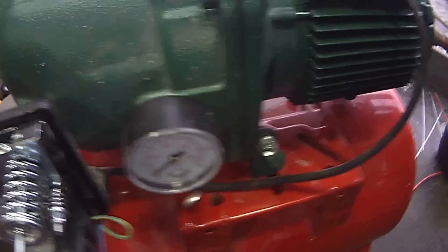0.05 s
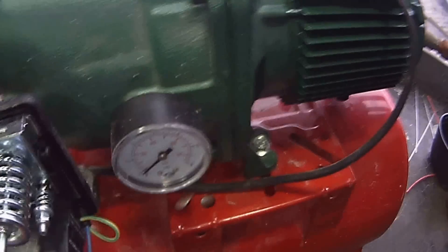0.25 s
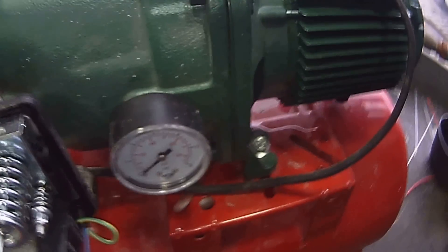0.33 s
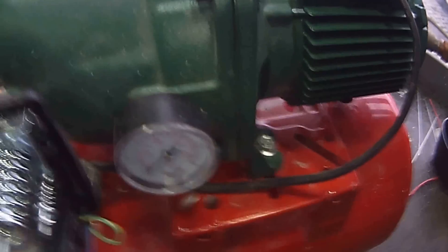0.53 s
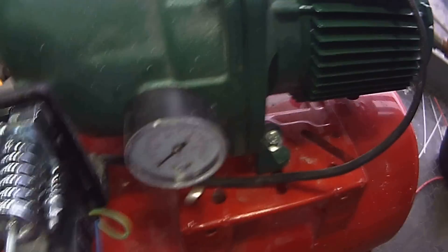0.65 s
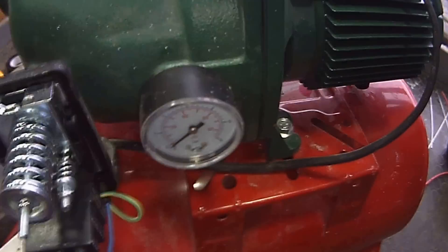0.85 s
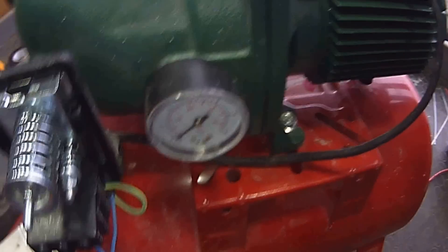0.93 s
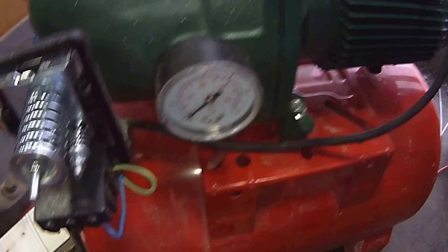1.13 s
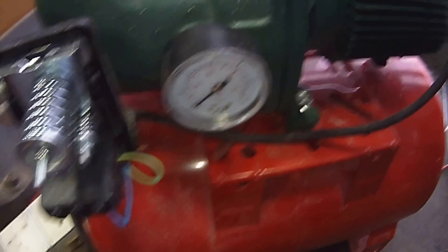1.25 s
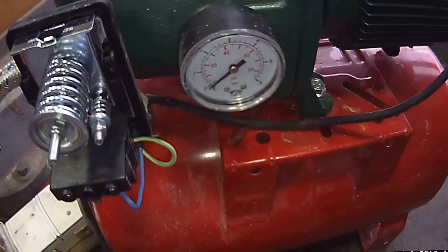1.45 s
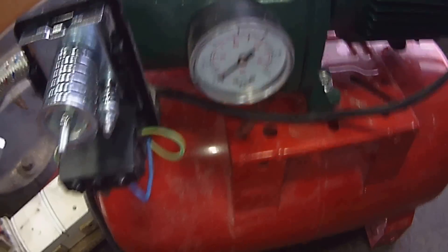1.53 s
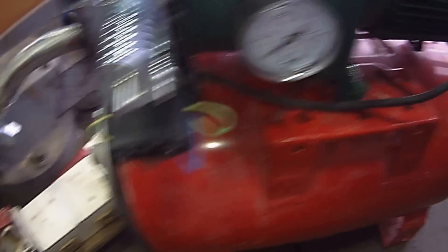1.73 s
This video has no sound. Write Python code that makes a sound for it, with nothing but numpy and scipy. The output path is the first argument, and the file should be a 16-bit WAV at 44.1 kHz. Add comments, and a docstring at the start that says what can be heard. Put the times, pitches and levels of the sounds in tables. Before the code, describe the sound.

A pump's pressure switch snaps over with one heavy, close clack at about 0.2 seconds, briefly ringing the housing and steel tank in a small room. Dying rattles, soft low thumps and light metal ticks follow until about 0.6 seconds, with a short spring chatter near 0.5 seconds. The tail fades by about one second, leaving the faint low hum and rumble that run throughout.

```python
"""Pump pressure switch snapping over

The sprung lever of a water pump's pressure switch lands with one heavy clack, close by in a small room.
The blow rings the housing and the steel tank; the mechanism shudders in a few dying rattles, ticks,
and its spring chatters. A low hum and rumble carry on underneath."""
import sys
import numpy as np
from scipy import signal
from scipy.fft import irfft
from scipy.io import wavfile
from scipy.ndimage import uniform_filter1d

SR = 44100
rng = np.random.default_rng(int(sys.argv[2]) if len(sys.argv) > 2 else 0)


def log_audio(samples):
    """Write samples as a 16-bit WAV file to the path given in sys.argv[1]."""
    # one column per channel
    frames = np.atleast_2d(samples).T
    # limit to full scale, then quantise
    limited = np.clip(frames, -1, 1)
    pcm = np.round(limited * 32767).astype(np.int16)
    wavfile.write(sys.argv[1], SR, pcm)


N = 79380


def amp(db):
    """Decibels to gain."""
    return 10 ** (np.asarray(db) / 20)


def unit(x):
    """Scale to an rms of one."""
    return x / np.sqrt(np.mean(x ** 2) + 1e-18)


def since(start):
    """Seconds since a moment, zero before it."""
    return np.maximum(np.arange(N) / SR - start, 0)


def strike(start, t60, contact_s=0.00059):
    """Hit envelope: a fast attack as the contact builds its force, then an exponential decay."""
    t = since(start)
    attack = np.sin(np.pi / 2 * np.minimum(t / contact_s, 1)) ** 2
    return attack * np.exp(-np.log(1000) * t / t60)


def noise(colour):
    """Steady noise at unit rms, shaped by an EQ curve."""
    hz, db = np.array(colour).T
    freqs = np.maximum(np.fft.rfftfreq(N, 1 / SR), 1)
    gain = amp(np.interp(np.log(freqs), np.log(hz), db))
    return unit(irfft(gain * np.exp(2j * np.pi * rng.random(len(freqs))), N))


def ring(modes, start):
    """Decaying modes struck together; neighbours swing in opposite directions."""
    t = since(start)
    return sum((-1) ** (k + 1) * amp(db) * strike(start, t60) * np.sin(2 * np.pi * hz * t)
               for k, (hz, db, t60) in enumerate(modes))


def resonate(push, peaks):
    """Drive parallel resonators of alternating polarity; the mix comes out at unit rms."""
    return unit(sum((-1) ** k * amp(db) * signal.lfilter(*signal.iirpeak(hz, hz / width, fs=SR), push)
                    for k, (hz, width, db) in enumerate(peaks)))


def band(x, kind, hz, order):
    """Low-pass or band-pass with a flat passband."""
    return signal.sosfilt(signal.butter(order, hz, kind, fs=SR, output="sos"), x)


# EQ of the blow's transient (frequency [Hz], relative level [dB])
CRACK_EQ = [(40, -32), (90, -18), (240, 7.5), (420, -13), (560, -18), (850, -7.5), (1400, -12.5),
            (2700, -15.5), (3500, -28.5), (4700, -38), (6200, -34.5), (9200, -39.5), (11000, -47.5),
            (15500, -61)]
# EQ of the room's answer (frequency [Hz], relative level [dB])
ROOM_EQ = [(45, -28), (70, -3), (125, 0.5), (240, 4.5), (350, 4.5), (550, -4.5), (820, -8.5), (1200, -6),
           (2000, -12.5), (2650, -9.5), (3400, -26), (4700, -47), (6200, -34.5), (7500, -40), (9200, -33),
           (11000, -56), (15500, -62)]
# ring of the housing and tank (frequency [Hz], relative level [dB], t60 [s])
BODY_MODES = [(70.3, -11, 0.75), (82.4, -26.5, 0.22), (173, -6, 0.19), (235, 4, 0.21), (268, 0, 0.15),
              (281.8, -2.5, 0.21), (339, -12, .2), (427.7, -14, 0.32), (745, -19, 0.3), (811.5, -4, 0.11),
              (986, -21, 0.65), (1200, -33, 0.13), (1780, -42, .2), (2140, -19, 0.17)]
# thin, high ring of the contacts (frequency [Hz], level [dB], t60 [s])
CONTACT_MODES = [(9120, -60, .5), (9390, -58.5, 0.48)]


def clack(start=0.2303):
    """The lever hits its stop: a crack, ringing body and contacts, and the bloom of the room."""
    crack = amp(-18.5) * noise(CRACK_EQ) * strike(start, t60=0.1)
    bloom = 1 - np.exp(-since(start) / 0.0041)
    room = amp(-25) * noise(ROOM_EQ) * strike(start, t60=0.65) * bloom
    body = amp(-18.5) * ring(BODY_MODES, start)
    return crack + room - body + ring(CONTACT_MODES, start)


# low-end hits of the tank (time [s], level [dB])
THUMP_CUES = [(.2315, -28.5), (0.307, -34.5), (0.454, -32.5), (.548, -33), (.602, -36)]


def thumps(hz=82, rise_s=0.019):
    """The tank heaves for a few slow cycles, adding weight under the clack and rattles."""
    out = 0
    for start, db in THUMP_CUES:
        t = since(start)
        swell = (t / rise_s * np.exp(1 - t / rise_s)) ** 2
        out += amp(db) * swell * np.sin(2 * np.pi * hz * t)
    return out


# shudders of the mechanism (time [s], length [s], thud [dB], clatter [dB], scrape [dB])
RATTLE_CUES = [(.256, 0.045, -31.5, -36.5, -56), (0.301, 0.054, -29.5, -32.5, -55.5),
               (0.391, .03, -39, -45.5, -71), (0.414, 0.043, -40.5, -35, -67),
               (0.448, 0.025, -35.5, -38, -60), (0.49, 0.0454, -43.5, -51, -63),
               (0.528, .036, -43, -46, -58.5), (0.57, 0.062, -44, -47, -69)]
# dull resonances of the tank (frequency [Hz], width [Hz], relative level [dB])
THUD_PEAKS = [(147, 63, -3), (252.6, 77, 1.5), (337, 33, -5), (433, 84, -5.5)]
# midrange resonances of the housing (frequency [Hz], width [Hz], relative level [dB])
CLATTER_PEAKS = [(475, 45, -9), (657, 105, 1.5), (836, 43, 9.5), (1011, 68, -1.5), (1148, 82, -1),
                 (1410, 135, -3), (1810, 190, -8.5), (2070, 81, -3), (2437, 166, -3.5), (2890, 87, -8),
                 (3190, 89, -15)]
# bright metal EQ of the scrape and the ticks (frequency [Hz], relative level [dB])
METAL_EQ = [(500, -14), (2500, 14), (3700, 12), (4800, -0.5), (6200, 7), (7300, -1), (8800, 8.5),
            (10500, -7), (12500, -30), (15500, -28)]


def rattles(impacts_per_s=1500, scatter_db=0.5, edge=0.35):
    """Bursts of dense small impacts thud in the tank, clatter in the housing and scrape."""
    impacts = (rng.random(N) < impacts_per_s / SR) * rng.choice([-1, 1], N)
    impacts = impacts * amp(scatter_db * rng.standard_normal(N))
    thud = band(resonate(impacts, THUD_PEAKS), "lowpass", hz=900, order=2)
    clatter = band(resonate(impacts, CLATTER_PEAKS), "lowpass", hz=3540, order=6)
    scrape = noise(METAL_EQ)
    out = 0
    for start, length, thud_db, clatter_db, scrape_db in RATTLE_CUES:
        progress = since(start) / length
        # fade in and out, each over `edge` of the burst's length
        gate = np.clip(np.minimum(progress, 1 + edge / 2 - progress) / edge, 0, 1)
        out += gate * (amp(thud_db) * thud + amp(clatter_db) * clatter + amp(scrape_db) * scrape)
    return out


# hits of the spring on its seat (time [s], level [dB])
CHATTER_CUES = [(.475, -29.5), (0.497, -39)]
# zing of the coils (frequency [Hz], width [Hz], relative level [dB])
SPRING_PEAKS = [(1830, 55, -5), (2421, 83, 1), (2690, 110, -5), (2990, 90, -11.5), (3160, 64, -11.5)]


def spring():
    """The spring chatters against its seat and its coils ring briefly."""
    coils = resonate(rng.standard_normal(N), SPRING_PEAKS)
    zing = band(coils, "bandpass", hz=(1800, 3340), order=3)
    return zing * sum(amp(db) * strike(start, t60=0.067) for start, db in CHATTER_CUES)


# light taps of the lever (time [s], level [dB])
TICK_CUES = [(0.3176, -44), (0.3904, -49.5), (0.4445, -45), (0.4694, -43), (0.4747, -46), (0.59, -50),
             (0.6038, -47.5)]


def ticks():
    """The lever touches lightly, metal on metal, dry and close."""
    return noise(METAL_EQ) * sum(amp(db) * strike(start, t60=0.025) for start, db in TICK_CUES)


def walls(x, wet_db=-7):
    """The walls add a short diffuse tail to the direct sound."""
    tail = rng.standard_normal(N) * strike(0, t60=0.89)
    return x + amp(wet_db) * signal.fftconvolve(x, tail / np.linalg.norm(tail))[:N]


# EQ of the rumble and rush (frequency [Hz], relative level [dB])
RUMBLE_EQ = [(10, -18), (22, -13), (32, -6), (43, 9), (56, -3.5), (78, -11), (102, -2.5), (125, -7),
             (165, -4.5), (260, -14), (450, -12.5), (620, -17), (735, -13.5), (900, -19.5), (1300, -25),
             (1900, -26.5), (2500, -24.5), (3200, -36), (4300, -43), (9000, -42), (15500, -44.5)]
# tones of the hum (frequency [Hz], level [dB])
HUM_TONES = [(100, -59.5), (700, -70), (742, -68.5)]


def background(waver_per_s=4.6):
    """A steady bed of rumble and rush, with a hum that wavers in level and phase."""
    window = int(SR / waver_per_s)
    bed = amp(-49.5) * noise(RUMBLE_EQ)
    for hz, db in HUM_TONES:
        drift = uniform_filter1d(uniform_filter1d(rng.standard_normal((2, N)), window), window)
        waver = 1 + 0.5 * unit(drift[0])
        tone = np.sqrt(2) * np.sin(2 * np.pi * hz * since(0) + unit(drift[1]))
        bed += amp(db) * waver * tone
    return bed


def scene():
    """Mono mix: the clack and its aftermath over the bed, with reverb on the rattles and spring."""
    return (clack() + thumps() + ticks() + walls(rattles() + spring()) + background())[None]


def record(dry, top_hz=15700):
    """A steep high cut on the whole mix."""
    return signal.sosfilt(signal.ellip(10, 0.2, 80, top_hz, fs=SR, output="sos"), dry)


dry = scene()
out = record(dry)
log_audio(out)
```